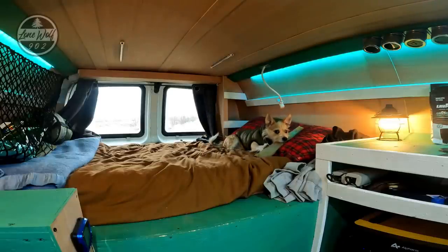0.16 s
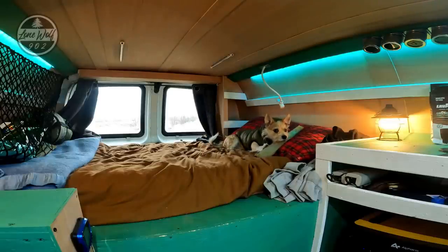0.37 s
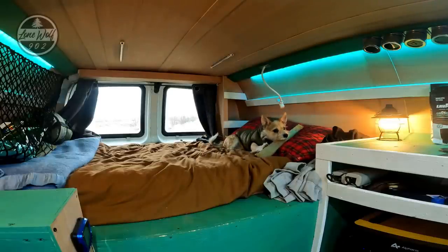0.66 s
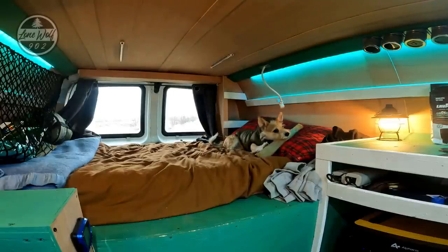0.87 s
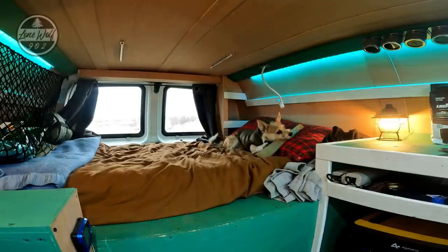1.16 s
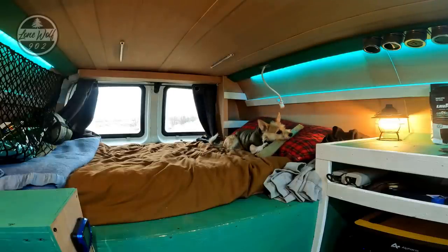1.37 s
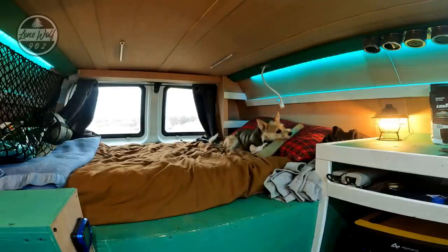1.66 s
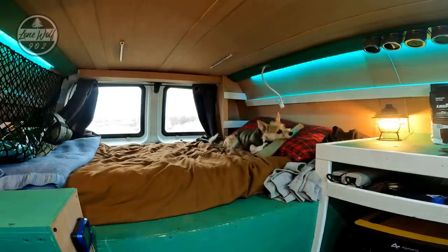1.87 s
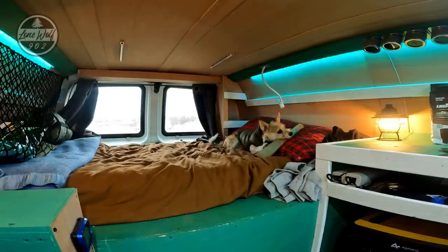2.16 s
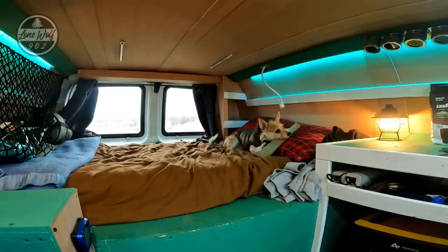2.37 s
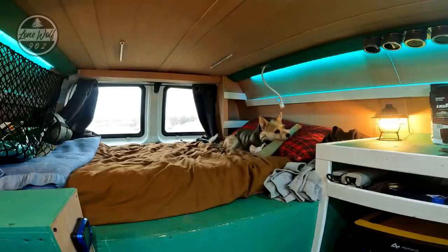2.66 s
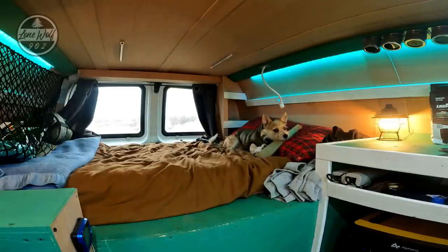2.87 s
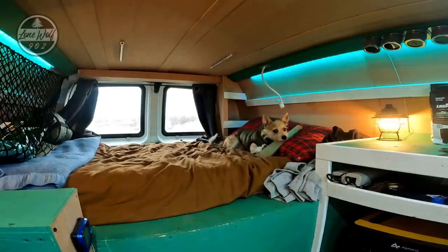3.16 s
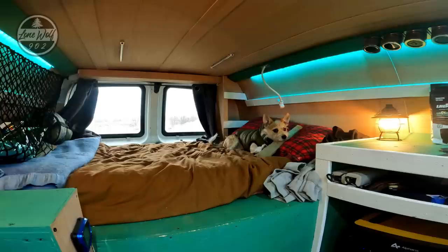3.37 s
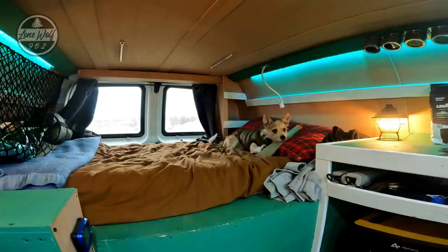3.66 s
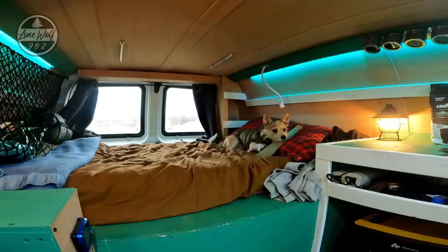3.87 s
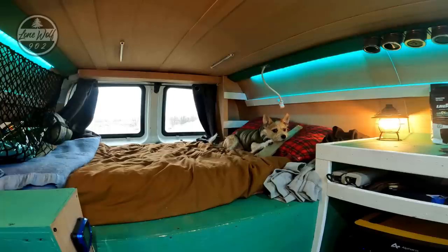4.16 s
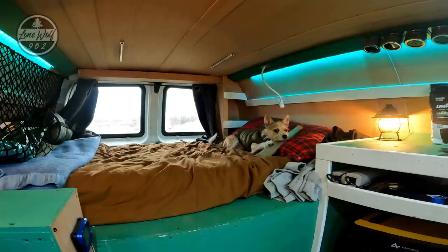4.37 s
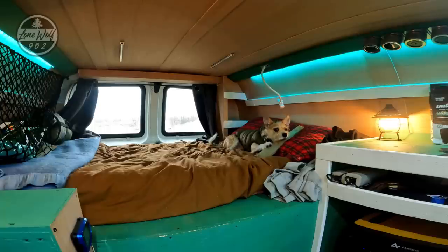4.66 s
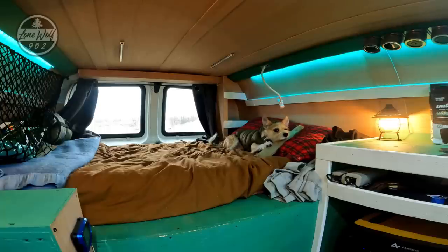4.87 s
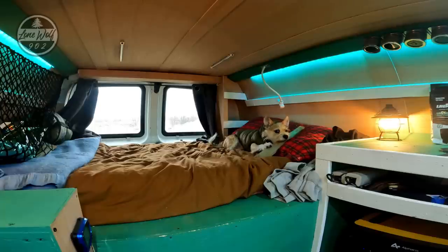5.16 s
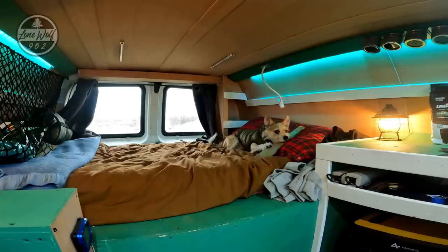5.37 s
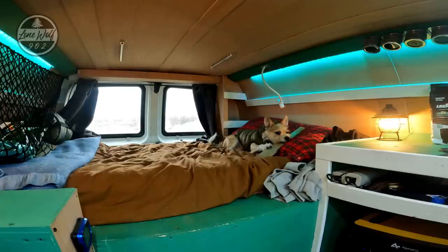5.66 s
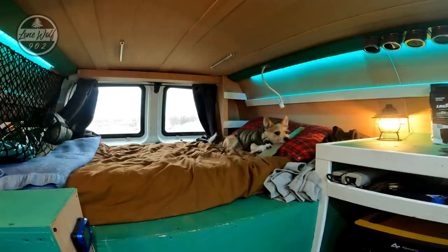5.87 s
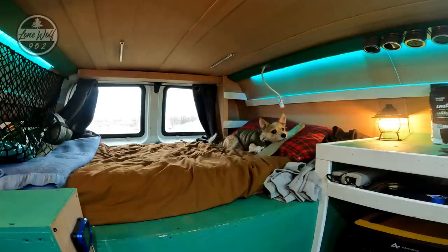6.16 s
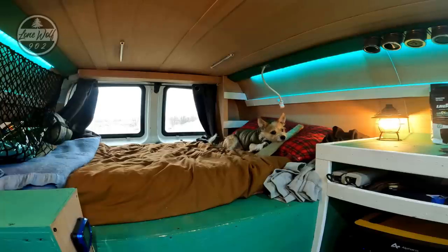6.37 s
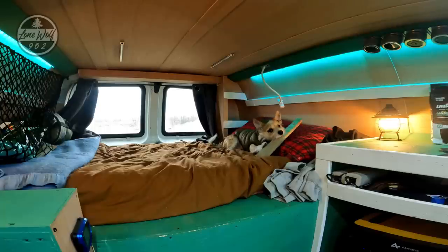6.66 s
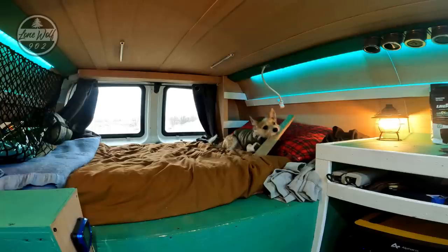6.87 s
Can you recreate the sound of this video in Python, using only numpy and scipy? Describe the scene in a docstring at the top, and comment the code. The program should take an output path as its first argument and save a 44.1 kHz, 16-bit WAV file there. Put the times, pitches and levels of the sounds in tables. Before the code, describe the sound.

Inside a small padded camper van, a dog on a bed chews a wooden board. Faint rasps and clicks lead to two loud dry cracks, then sparser nibbling with cloth rustle and a hard knock midway. A heavy crack with a thud comes late, followed by dense cracking to the end. The sound is close, dry and nearly mono, over faint room tone.

```python
"""A dog lies on the bed of a small padded camper van and gnaws a wooden board.
Teeth first rasp along the grain, then snap and crush fibres; sharp cracks follow near 1.4 s and 2.2 s.
Sparser bites lead to a hard thud at 3.7 s, the heaviest near 5.9 s, and dense cracking from 6.4 s to the end.
Random fracture impulses ring damped board modes; soft shoves of the board against the bedding make the thuds.
Throughout, grains of noise grind and rustle, the bed bumps and rumbles, and a quiet room tone persists."""
import sys
import numpy as np
from scipy import signal
from scipy.fft import rfft, irfft
from scipy.io import wavfile

SR = 44100
rng = np.random.default_rng(int(sys.argv[2]) if len(sys.argv) > 2 else 0)


def int16_out(signal):
    """Quantize to a 16-bit WAV file."""
    q = np.round(np.clip(np.atleast_2d(signal).T, -1, 1) * 32767)
    wavfile.write(sys.argv[1], SR, q.astype(np.int16))


N = 310012   # samples


def from_db(db):
    """Logarithmic level: 20 dB are a factor of ten in amplitude."""
    return 10 ** (np.asarray(db) / 20)


def unit_energy(x):
    """Energy normalization: scale to a sum of squares of 1."""
    return x / np.sqrt(np.sum(x ** 2) + 1e-20)


def rms_one(x):
    """Power normalization: scale to rms 1."""
    return x / np.sqrt(np.mean(x ** 2) + 1e-20)


def drift(rate):
    """Slow random fluctuation of rms 1: straight lines between rate random knots a second."""
    knots = rng.standard_normal(4000)
    return rms_one(np.interp(np.arange(N) / SR * rate, np.arange(len(knots)), knots))


def coloured(x, spectrum):
    """Spectral shaping: weight a steady sound over log frequency, then scale it to rms 1."""
    hz, db = np.transpose(spectrum)
    f = np.maximum(np.fft.rfftfreq(N, 1 / SR), 1)
    gain = from_db(np.interp(np.log(f), np.log(hz), db))
    return rms_one(irfft(rfft(x) * gain, N))


def resonate(x, hz, width_hz):
    """Damped resonance: a two-pole filter whose bandwidth sets the rate of decay."""
    r = np.exp(-np.pi * width_hz / SR)
    poles = [1, -2 * r * np.cos(2 * np.pi * hz / SR), r * r]
    return signal.lfilter([1 - r, 0, r - 1], poles, x + 1e-18)


def band(x, low_hz, high_hz):
    """Causal band-pass filtering."""
    return signal.sosfilt(signal.butter(2, [low_hz, high_hz], "band", fs=SR, output="sos"), x)


def grains(size, per_s, spread_db):
    """Shot noise: random clicks of uneven strength and sign."""
    strength_db = spread_db * np.minimum(rng.exponential(1, size), 4)
    strength = from_db(strength_db) * rng.choice([-1, 1], size)
    return strength * (rng.random(size) < per_s / SR)


def add(out, start_s, sound):
    """Superposition: mix a sound in from a given time on."""
    start = int(start_s * SR)
    out[start:start + len(sound)] += sound[:N - start]


def burst_gain(length_s):
    """Energy is power times duration: gain that gives a unit-energy sound rms 1 over length_s."""
    return np.sqrt(length_s * SR)


def swells(rows, idle_db, rise_share, fall_share):
    """Power summation: level in dB of movements that each swell and ebb over an idle level."""
    t = np.arange(0, N, 40) / SR
    power = 0
    for s, length_s, db in rows:
        reach_s = length_s * np.where(t < s, rise_share, fall_share)
        swell = from_db(db) * np.exp(-np.abs((t - s) / reach_s) ** 1.49)
        power = power + swell ** 2
    return 10 * np.log10(np.interp(np.arange(N) / SR, t, power) + from_db(idle_db) ** 2)


def strike(force, modes, favoured_hz, focus_db):
    """Modal excitation: the contact lowers each mode by focus_db per octave away from favoured_hz."""
    out = 0
    for hz, width_hz, db in modes:
        octaves_away = abs(np.log2(hz / favoured_hz))
        gain = from_db(db - focus_db * octaves_away + rng.normal())
        held_hz = hz * (1 + .012 * rng.normal())   # pitch varies from contact to contact
        out = out + gain * unit_energy(resonate(force, held_hz, width_hz))
    return out


def tear(t, length_s, build_s, strain_db, linger_db):
    """Avalanche fracture: fibres crackle under strain, give way together, and a few stragglers follow."""
    before, after = np.minimum(t, 0), np.maximum(t, 0)
    avalanche = np.exp(before / build_s - (after / length_s) ** 3)
    strain = from_db(strain_db) * np.exp(before / 0.0058) * (t < 0)
    stragglers = from_db(linger_db) * np.exp(-after / (0.91 * length_s)) * (t >= 0)
    return grains(len(t), per_s=12000, spread_db=4.0) * (avalanche + strain + stragglers)


def evened(x, order):
    """Whitening by linear prediction: flatten broad humps and holes, as fractures excite all pitches alike."""
    lags = np.arange(order + 1)
    autocorrelation = irfft(np.abs(rfft(x, 2 * len(x))) ** 2)[lags]
    lag_matrix = autocorrelation[np.abs(lags[1:, None] - lags[1:])]
    predictor = np.linalg.solve(lag_matrix, autocorrelation[1:])
    return unit_energy(signal.lfilter(np.append(1, -predictor), [1], x))


# fibres snap at once under a tooth; levels before the board's response:
# t/s, knock level/dB, ring level/dB, splinter level/dB, knock f/Hz, ring f/Hz, tear length/s
SNAPS = [(0.242, -30, -31, -31.5, 1710, 3200, 0.0031), (0.249, -29.5, -31, -29, 1700, 3150, 0.011),
         (0.291, -39.5, -36.5, -37.5, 1700, 3030, .006), (0.801, -58, -38, -45, 1500, 3630, 0.0032),
         (1.1726, -27.5, -29, -51.5, 700, 2900, 0.0024), (1.3902, -19.5, -7.5, -19, 1200, 3040, 0.0016),
         (1.3957, -36, -33, -27, 1210, 3200, .005), (2.1332, -45, -37.5, -44.5, 1200, 3040, 0.0028),
         (2.1684, -19, -9, -17, 1390, 3064, 0.0014), (3.7406, -24.5, -27, -37, 1470, 3000, 0.0018),
         (3.97, -38.5, -39, -52, 1810, 3000, 0.0035), (3.9854, -32, -35, -44, 1820, 2960, 0.011),
         (4.154, -57, -41, -41.5, 1400, 2800, 0.0033), (4.801, -63, -50, -48, 900, 2930, 0.0018),
         (5.8487, -27.5, -21, -23.5, 1160, 3040, 0.0016), (5.8758, -23.5, -14, -18, 1200, 3080, 0.0031),
         (6.154, -34.5, -33.5, -50, 1810, 3000, 0.0017), (6.161, -42, -31, -47, 1700, 2860, 0.0019),
         (6.169, -28.5, -29, -44, 1660, 2970, 0.0074), (6.245, -46, -43, -65, 890, 2960, 0.0027),
         (6.413, -42, -36, -45, 1200, 2990, 0.0017), (6.437, -20, -18, -24.5, 1550, 3030, 0.0015),
         (6.458, -28.5, -26.5, -24.5, 1330, 3430, 0.0029), (6.652, -46, -33.5, -49, 1210, 3010, 0.0033),
         (6.9773, -27.5, -24.5, -29, 1380, 2900, 0.0081), (6.9921, -31, -20, -26, 1390, 2860, 0.0017),
         (7.0114, -19, -18, -23.5, 1370, 2920, 0.0059)]
SNAP_BUILD_S = 0.00053
# fibres are crushed more slowly, swelling and giving way: same columns
CRUSHES = [(0.1148, -42.5, -49, -48.5, 1610, 3060, .007), (0.232, -43, -34, -38.5, 1300, 3230, .004),
           (0.5144, -55, -56, -44, 1200, 3040, 0.0054), (0.5428, -65, -40, -52, 1300, 2700, 0.0045),
           (1.3851, -35, -43, -34.5, 1210, 3070, 0.0038), (1.804, -68, -55, -50, 1300, 2950, 0.0035),
           (2.045, -48, -40.5, -64, 1290, 2970, 0.0059), (3.2276, -51, -51, -45.5, 1310, 3260, 0.0091),
           (4.056, -64, -59, -48, 1200, 2950, .005), (4.078, -64, -58, -52, 1200, 2950, .004),
           (5.159, -32.5, -32, -37.5, 1000, 2900, 0.0038), (5.319, -48, -49, -48, 1100, 2750, 0.0071),
           (5.8006, -39, -36, -40, 1090, 3000, 0.0065), (5.8225, -41, -55, -43, 1200, 3120, .007),
           (5.886, -28, -29, -49, 1330, 3030, 0.0028), (6.138, -39, -40, -56, 1300, 2930, 0.0055),
           (6.453, -34, -41, -45, 1390, 2820, 0.0048), (6.489, -33.5, -31, -33.5, 1300, 2930, .01),
           (6.815, -42.5, -43.5, -61, 1300, 3080, 0.0081), (6.8463, -37, -51, -53, 1280, 2780, 0.013),
           (6.968, -32, -29.5, -37, 1300, 2870, 0.015), (6.999, -19, -21, -23, 1250, 2900, 0.0066)]
CRUSH_BUILD_SHARE = 0.94   # time of the swell, as a share of the tear's length
# modes of the board's knock: f/Hz, width/Hz, relative level/dB
KNOCK_RESONANCES = [(745, 100, 2.5), (1115, 370, 2), (1263, 200, 2), (1410, 27, -2.5), (1653, 126, 9),
                    (1825, 63, 6.5)]
# modes of its splintery top: f/Hz, width/Hz, relative level/dB
SPLINTER_RESONANCES = [(3940, 810, 3.5), (4420, 460, -4.5), (4960, 980, -3), (5640, 270, -1.5),
                       (6500, 180, -3), (7220, 150, -2), (7550, 370, -35), (9400, 650, 2),
                       (10560, 2600, -22.5)]
SPLINTER_HZ, SPLINTER_SCATTER_OCTAVES = 4800, 0.13   # favoured pitch and its spread
RING_WIDTH_HZ = 270


def bites():
    """Impulsive excitation: each tear drives the board's knock, main ring and splintery top."""
    t = np.arange(-(SR // 40), SR // 10) / SR
    out = np.zeros(N)
    tears = [(*row, SNAP_BUILD_S) for row in SNAPS]
    tears += [(*row, CRUSH_BUILD_SHARE * row[-1]) for row in CRUSHES]
    for s, knock_db, ring_db, splinter_db, knock_hz, ring_hz, length_s, build_s in tears:
        force = evened(tear(t, length_s, build_s, strain_db=-28.5, linger_db=-27.0), order=56)
        splinter_hz = SPLINTER_HZ * 2 ** (SPLINTER_SCATTER_OCTAVES * rng.normal())
        knock = band(strike(force, KNOCK_RESONANCES, knock_hz, focus_db=16.0), 455, 1730)
        ring = band(resonate(force, ring_hz, RING_WIDTH_HZ), 2670, 3410)
        splinter = band(strike(force, SPLINTER_RESONANCES, splinter_hz, focus_db=15.0), 1570, 8840)
        bite = from_db(knock_db) * unit_energy(knock)
        bite += from_db(ring_db) * unit_energy(ring)
        bite += from_db(splinter_db) * unit_energy(splinter)
        add(out, s + t[0], burst_gain(.0025) * bite)
    return out


# the board bumps against the bedding: t/s, level before the board's response/dB,
# contact time/s (short = hard, long = soft)
BUMPS = [(0.117, -44.5, 0.002), (0.245, -39.5, 0.00087), (0.543, -42, 0.0017), (0.6355, -39, 0.0011),
         (0.68, -43, 0.00081), (1.1726, -31.5, 0.00076), (1.3925, -27.5, 0.00061), (2.1688, -33, 0.00088),
         (2.9223, -38.5, .0009), (3.7415, -21.5, 0.00044), (5.0006, -38.5, .0008), (5.16, -40.5, 0.00065),
         (5.877, -44, 0.001), (5.8895, -17, .0012), (6.246, -41, 0.00061), (6.4395, -36.5, 0.0013),
         (6.489, -52, 0.00087), (6.6528, -37, 0.00071), (6.964, -35.5, 0.0011), (6.9932, -35, 0.00029),
         (7.012, -35, 0.00031)]
# low modes of the whole board: f/Hz, width/Hz, relative level/dB
THUD_RESONANCES = [(166, 52, -9), (259, 113, 4.5), (448, 52, -8), (720, 92, 0)]


def thuds():
    """Contact-time principle: a soft shove rings low modes, and a shorter one reaches higher pitches."""
    t = np.arange(-(SR // 200), SR // 10) / SR
    out = np.zeros(N)
    for s, db, contact_s in BUMPS:
        shove = np.exp(-(t / contact_s) ** 2)
        # the negative focus slightly favours modes away from 253 Hz
        thud = band(strike(shove, THUD_RESONANCES, 253, focus_db=-1.5), 164, 630)
        add(out, s + t[0], burst_gain(.0025) * from_db(db) * unit_energy(thud))
    return out


# a tooth dragged along the grain: start t/s, end t/s, rms level before the board's response/dB, favoured f/Hz
DRAGS = [(0.074, 0.13, -56, 2200), (0.152, 0.211, -49.5, 3570), (2.471, 2.585, -58, 696),
         (4.418, 4.544, -56.5, 1970), (5.32, 5.382, -56, 700), (5.761, 5.824, -50, 3800),
         (6.797, 6.87, -56, 1400)]
# what a dragged tooth rings: f/Hz, width/Hz, relative level/dB
DRAG_RESONANCES = [(570, 63, -8), (1310, 220, -1), (1650, 260, 0), (2960, 83, 3), (4140, 540, -5),
                   (5570, 460, -6), (6900, 280, -7)]


def rasps():
    """Stick-slip friction: the dragged tooth excites modes in quick uneven steps."""
    out = np.zeros(N)
    t = np.arange(SR // 4) / SR
    for start_s, end_s, level_db, favoured_hz in DRAGS:
        length_s = end_s - start_s
        stroke = np.clip(np.minimum(t, length_s - t) / 0.0033, 0, 1)
        slips = grains(len(t), per_s=1300, spread_db=2.0) * stroke
        sound = unit_energy(band(strike(slips, DRAG_RESONANCES, favoured_hz, focus_db=8.5), 330, 7000))
        add(out, start_s, from_db(level_db) * burst_gain(length_s) * sound)
    return out


# strokes of the jaw: t/s at the height, length/s, blanket rustle level/dB, tooth grinding level/dB
# (levels before the trims and fluctuations in chewing)
JAW_STROKES = [(0.077, 0.02, -53, -55), (0.19, 0.18, -53.5, -62), (0.507, 0.093, -51.5, -53.5),
               (0.674, 0.045, -62, -50.5), (0.824, 0.054, -59, -55.5), (1.014, 0.15, -54, -55.5),
               (1.25, 0.091, -56, -49.5), (1.38, 0.14, -56, -51), (1.824, 0.071, -61.5, -59),
               (2.054, .11, -56.5, -52.5), (2.402, .035, -55, -50), (2.475, 0.038, -57, -52.5),
               (2.693, 0.029, -56, -55), (2.81, 0.27, -58, -58.5), (3.019, 0.071, -54, -57),
               (3.244, 0.065, -55.5, -65), (3.55, 0.075, -62, -68), (3.984, 0.053, -53, -48),
               (4.09, 0.11, -54.5, -60), (4.218, .09, -57, -60), (4.442, 0.088, -51.5, -53.5),
               (4.613, 0.055, -52.5, -56), (4.825, 0.21, -56, -57.5), (5.17, 0.093, -54, -61),
               (5.35, 0.072, -60.5, -61), (5.525, .08, -59, -61), (5.692, 0.058, -47.5, -49.5),
               (5.764, 0.11, -50, -52.5), (6.132, .13, -51, -58), (6.373, 0.22, -52, -51),
               (6.656, 0.082, -50.5, -55), (6.814, 0.14, -56.5, -53)]
CHEW_RISE_SHARE, CHEW_FALL_SHARE = 0.73, 0.88   # of the stroke's length
# the dog is never quite still; levels before the same trims
IDLE_RUSTLE_DB, IDLE_GRIND_DB, IDLE_SWAY_DB = -68.5, -71, 4
# spectrum of the moving cloth: f/Hz, relative level per Hz/dB
CLOTH_SPECTRUM = [(500, 1.5), (1700, 8), (2500, 2.5), (4200, 3), (6000, 0.5), (7300, -4.5), (8500, -14.5),
                  (10200, -9), (12800, -25), (14500, -36)]
TICKS_PER_S, TICKS_DB = 45, -13   # single fibres parting; level against the cloth


def chewing():
    """Granular friction: cloth rustles in fine grains with fibre ticks, teeth grind in coarser ones."""
    s, length_s, rustle_peak_db, grind_peak_db = np.transpose(JAW_STROKES)
    sway_db = IDLE_SWAY_DB * drift(7)
    shares = CHEW_RISE_SHARE, CHEW_FALL_SHARE
    rustle_db = swells(zip(s, length_s, rustle_peak_db), IDLE_RUSTLE_DB + sway_db, *shares)
    grind_db = swells(zip(s, length_s, grind_peak_db), IDLE_GRIND_DB + sway_db, *shares)

    cloth = coloured(grains(N, per_s=5000, spread_db=1.5), CLOTH_SPECTRUM)
    ticks = rms_one(band(grains(N, per_s=TICKS_PER_S, spread_db=4.0), 2000, 7970))
    rustle = (cloth + from_db(TICKS_DB) * ticks) * from_db(rustle_db - 3.0 + 2.0 * drift(60))

    scrapes = grains(N, per_s=790, spread_db=4.0)
    high_wood = rms_one(resonate(scrapes, 2904, 230))
    low_wood = rms_one(resonate(scrapes, 1530, 350))
    wood = high_wood + from_db(-15.0) * low_wood
    grind = rms_one(band(wood, 1100, 2550)) * from_db(grind_db - 2.0 + 2.0 * drift(45))
    return rustle, grind


# lightly damped modes of the board that sing on after every contact: f/Hz, relative level/dB
SINGING_MODES = [(1067, 5.5), (1170, 1), (1242, -15), (1382, -5), (1590, 13), (1720, -16), (2712, -32),
                 (3052, -9), (3200, -20), (3268, -35), (3428, -48), (3808, -28), (3900, 16), (4172, 13),
                 (4325, 21.5), (4838, 14), (5587, 3), (5830, -2), (6148, -19), (7290, 14)]
SINGING_WIDTH_HZ = 42
BOARD_DIP_HZ, BOARD_DIP_Q = 1500, 12.7   # the board radiates little between two of its modes


def board(x):
    """Modal superposition: long-lived modes colour every contact with the wood."""
    x = signal.lfilter(*signal.iirnotch(BOARD_DIP_HZ, BOARD_DIP_Q, fs=SR), x)
    singing = sum(from_db(db) * resonate(x, hz, SINGING_WIDTH_HZ) for hz, db in SINGING_MODES)
    return from_db(-1.5) * x + from_db(-16.5) * singing


VAN_T60_S, VAN_ECHO_DB = 0.084, -7.5   # main decay; echo energy against the direct sound


def van(x):
    """Reverberation: close panels return a dense patter of reflections that the bedding soon soaks up."""
    t = np.arange(SR // 4) / SR
    arriving = np.clip((t - .003) / 0.00018, 0, 1)
    dying = from_db(-60 * t / VAN_T60_S) + from_db(-29 - 60 * t / 0.31)   # plus a faint longer tail
    patter = grains(len(t), per_s=3800, spread_db=-8.5)
    echoes = unit_energy(band(patter, 220, 19845) * arriving * dying)
    return x + from_db(VAN_ECHO_DB) * signal.fftconvolve(x, echoes)[:N]


# the dog shifts its weight on the bed: t/s at the height, length/s, mattress level/dB, van body rumble level/dB
# (mattress levels before the fluctuation in bed)
WEIGHT_SHIFTS = [(0.12, .08, -76, -59), (0.674, 0.06, -57, -73), (0.784, .08, -79, -59),
                 (1.197, 0.056, -45.5, -71), (1.412, 0.038, -47, -52), (1.832, .18, -60, -63),
                 (2.23, 0.15, -59, -59), (2.544, 0.066, -52, -73), (2.95, .1, -54, -52),
                 (3.104, .07, -65, -57), (3.244, .08, -58, -60), (3.765, 0.044, -45, -60),
                 (4.778, 0.12, -59, -57), (4.963, 0.31, -61, -72), (5.18, 0.09, -57, -54.5),
                 (5.58, 0.074, -53, -68), (5.755, 0.1, -52.5, -59), (5.906, 0.061, -45.5, -54),
                 (6.483, 0.08, -50, -59)]
SHIFT_RISE_SHARE, SHIFT_FALL_SHARE = 0.8, 0.61   # of the shift's length
IDLE_MATTRESS_DB, MATTRESS_SWAY_DB = -68.5, 2
IDLE_RUMBLE_DB, RUMBLE_SWAY_DB = -72.5, 1.5
# spectrum of the mattress bumps: f/Hz, relative level per Hz/dB
MATTRESS_SPECTRUM = [(25, -22), (60, -17), (100, -10), (160, 0.5), (230, -0.5), (330, -11.5), (500, -9.5),
                     (1000, -11.5), (3000, -53)]
# spectrum of the van body: f/Hz, relative level per Hz/dB
BODY_SPECTRUM = [(15, -9), (30, -4), (58, 13.5), (90, 7), (130, -4), (300, -59)]


def bed():
    """Modulated low noise: soft lumpy bumps and van body rumble swell as the dog shifts its weight."""
    s, length_s, bump_peak_db, rumble_peak_db = np.transpose(WEIGHT_SHIFTS)
    sway = drift(11)
    shares = SHIFT_RISE_SHARE, SHIFT_FALL_SHARE
    idle_mattress_db = IDLE_MATTRESS_DB + MATTRESS_SWAY_DB * sway
    idle_rumble_db = IDLE_RUMBLE_DB + RUMBLE_SWAY_DB * sway
    mattress_db = swells(zip(s, length_s, bump_peak_db), idle_mattress_db, *shares)
    rumble_db = swells(zip(s, length_s, rumble_peak_db), idle_rumble_db, *shares)
    bumps = coloured(rng.standard_normal(N), MATTRESS_SPECTRUM) * from_db(mattress_db + 2.0 * drift(31))
    rumble = coloured(rng.standard_normal(N), BODY_SPECTRUM) * from_db(rumble_db)
    return bumps + rumble


# spectrum of the quiet room: f/Hz, relative level per Hz/dB
ROOM_SPECTRUM = [(20, -12), (60, -24), (120, 0.5), (220, 2), (400, -0.5), (600, 2), (950, -3.5), (1400, -3),
                 (2300, -7.5), (3500, -11), (7000, -22), (10000, -34), (15000, -39)]
ROOM_TONE_DB = -55


def room_tone():
    """Stationary noise: a steady random background of fixed spectrum."""
    return from_db(ROOM_TONE_DB) * coloured(rng.standard_normal(N), ROOM_SPECTRUM)


def scene():
    """Linear superposition: all sources add and are heard from the middle."""
    rustle, grind = chewing()
    wood = board(bites() + thuds() + rasps() + grind)
    middle = van(wood + rustle) + bed() + room_tone()
    return np.tile(middle, (2, 1))


TREBLE_ROLL_OFF_HZ, CUTOFF_HZ = 13400, 15100


def record(dry):
    """Band limitation: a narrow notch, a treble roll-off and a steep cutoff;
    the top is spread in stereo with faint side hiss."""
    heard = signal.lfilter(*signal.iirnotch(9080, 14.0, fs=SR), dry)
    heard = signal.sosfilt(signal.butter(6, TREBLE_ROLL_OFF_HZ, fs=SR, output="sos"), heard)
    top = signal.sosfilt(signal.butter(8, 11500, "high", fs=SR, output="sos"), heard[0])
    scatter = unit_energy(rng.standard_normal(SR // 120))
    high_hiss = from_db(-92.5) * rms_one(band(rng.standard_normal(N), 4100, 15000))
    low_hiss = from_db(-101) * rms_one(band(rng.standard_normal(N), 30, 1200))
    side = from_db(-5.0) * signal.lfilter(scatter, [1], top) + high_hiss + low_hiss
    stereo = heard + np.array([side, -side])   # opposite signs spread the top and the hiss
    return signal.sosfilt(signal.ellip(10, .5, 70, CUTOFF_HZ, fs=SR, output="sos"), stereo)


dry = scene()
out = record(dry)
int16_out(out)
```